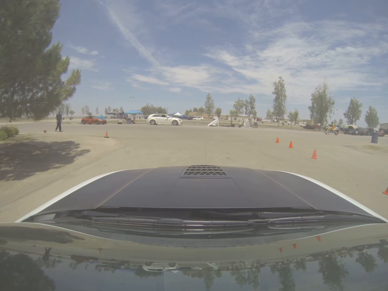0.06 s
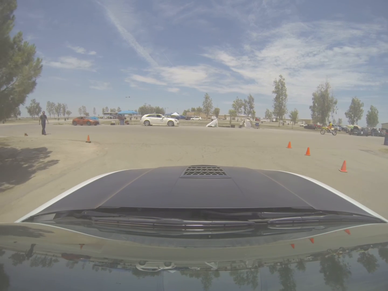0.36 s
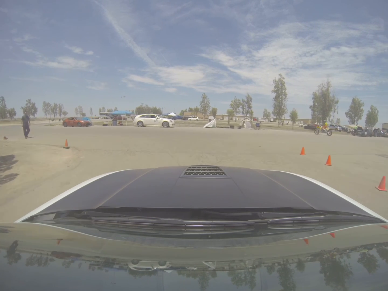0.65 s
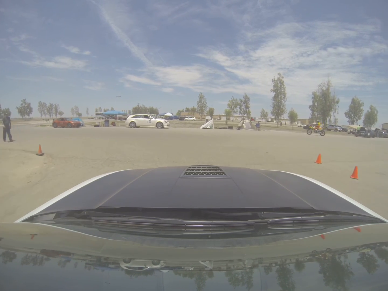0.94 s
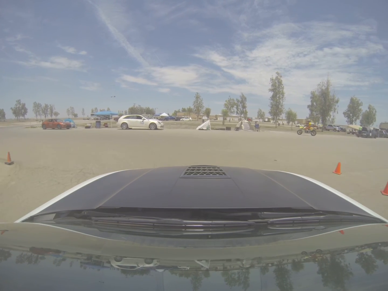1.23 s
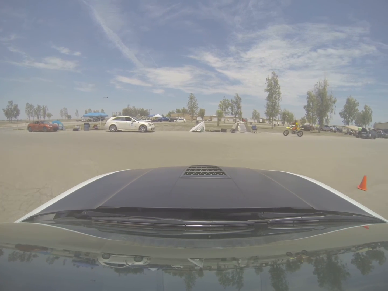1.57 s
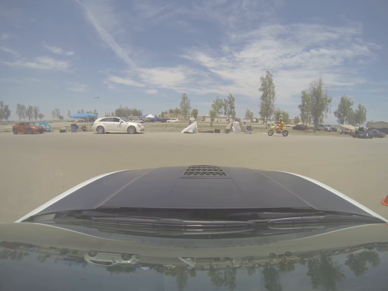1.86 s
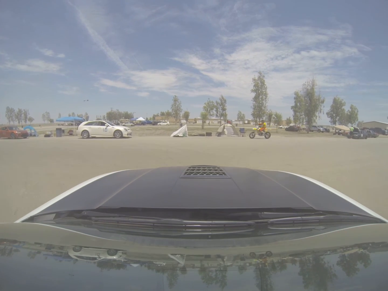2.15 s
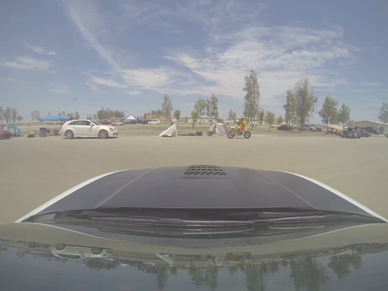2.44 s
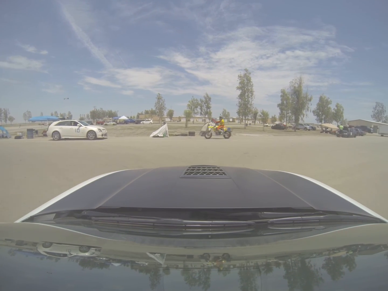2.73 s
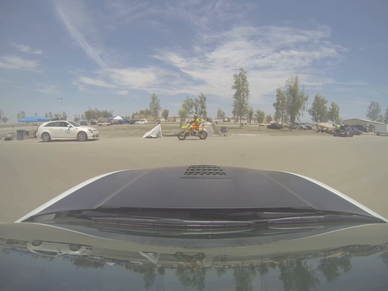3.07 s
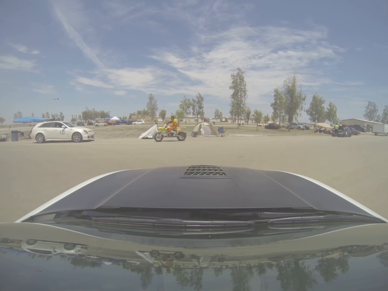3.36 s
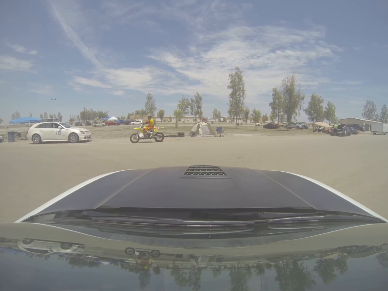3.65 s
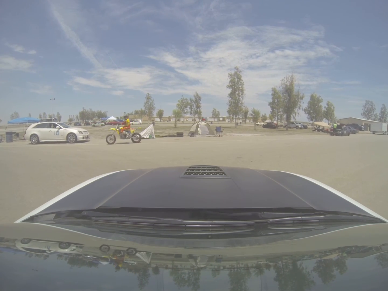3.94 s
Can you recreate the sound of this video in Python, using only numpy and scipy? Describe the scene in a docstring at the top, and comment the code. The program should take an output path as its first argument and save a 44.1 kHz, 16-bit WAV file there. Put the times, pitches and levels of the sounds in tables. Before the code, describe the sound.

A car engine rumbles at idle, heard inside the cabin, with tyre rumble and a low hum that sinks as the car slows. Soft bumps shake the body during the first two seconds, with a dull knock at about 2.2 seconds. A motorcycle thumps underneath from about half a second, growing louder near 3 seconds as it crosses in front with faint chain rasp and engine chatter.

```python
"""A car rolls slowly towards a halt on a paved paddock, heard from behind the windscreen.
From the start its idling engine booms in the cabin and whirrs under the bonnet, the tyres rumble,
the drive hum sinks and the camera adds hiss and a faint pulsing whine. A single-cylinder motorcycle
thumps closer while dips and seams shake the car's body. Later the brakes rub lightly and the
motorcycle crosses in front, its chain rasping and its engine chattering."""
import sys
import numpy as np
from scipy import signal
from scipy.fft import rfft, irfft
from scipy.io import wavfile
from scipy.ndimage import uniform_filter1d, map_coordinates

SR = 44100
rng = np.random.default_rng(int(sys.argv[2]) if len(sys.argv) > 2 else 0)


def pcm_store(signal):
    """Save signal as 16-bit PCM."""
    levels = np.round(np.clip(np.atleast_2d(signal), -1, 1) * 32767)
    wavfile.write(sys.argv[1], SR, levels.astype(np.int16).T)


N = 176400
T = np.arange(N) / SR


def undb(db):
    """Decibels to amplitude ratio."""
    return 10 ** (np.asarray(db) / 20)

def unit(x):
    """Normalisation to an rms of one."""
    return x / np.sqrt(np.mean(x ** 2))

def curve(rows, axis=1):
    """Linear interpolation of one column over time."""
    rows = np.array(rows)
    return np.interp(T, rows[:, 0], rows[:, axis])

def wander(per_s):
    """Smooth random fluctuation with an rms of one."""
    return unit(map_coordinates(rng.standard_normal(2000), [T * per_s + 2], order=3, mode="wrap"))

def colour(x, points):
    """Minimum-phase filtering through (Hz, dB) points."""
    points, size = np.array(points), 2 * N
    hz = np.maximum(np.arange(N + 1) * SR / size, 1)
    gain = undb(np.interp(np.log(hz), np.log(points[:, 0]), points[:, 1]))
    cepstrum = irfft(np.log(gain))
    cepstrum[1:N] *= 2
    cepstrum[N + 1:] = 0
    return irfft(rfft(x, size) * np.exp(rfft(cepstrum)))[:N]

def noise(points):
    """Coloured noise with an rms of one."""
    return unit(colour(rng.standard_normal(N), points))

def passband(x, order, hz, kind="lowpass"):
    """Maximally flat filtering."""
    return signal.sosfilt(signal.butter(order, hz, kind, fs=SR, output="sos"), x)

def resonate(x, hz, width_hz):
    """Two equal resonators in cascade, each of the given bandwidth."""
    b, a = signal.iirpeak(hz, hz / width_hz, SR)
    return signal.lfilter(b, a, signal.lfilter(b, a, x))

def ring(x, modes):
    """Modal response: convolution with a sum of damped sinusoids."""
    t = T[:N // 8]
    response = sum(undb(db) * np.sin(2 * np.pi * hz * t) * 1000 ** (-t / t60) for hz, db, t60 in modes)
    return signal.fftconvolve(x, response)[:N]

def pulse_train(cycles, scatter_db):
    """One impulse of random strength at each whole cycle."""
    at = np.flatnonzero(np.diff(np.floor(cycles)) > 0)
    out = np.zeros(N)
    out[at] = undb(scatter_db * rng.standard_normal(N // 100)[:len(at)])
    return out

def blows(rows):
    """Ideal impacts: single impulses at (s, dB)."""
    out = np.zeros(N)
    for start, db in rows:
        out[int(start * SR)] += undb(db)
    return out

def glide(rows, harmonic=1):
    """A harmonic of a tone following (s, Hz, dB rms); phase is the integral of frequency."""
    cycles = harmonic * np.cumsum(curve(rows)) / SR
    return np.sqrt(2) * np.sin(2 * np.pi * cycles) * undb(curve(rows, axis=2))

def swells(rows):
    """A sum of bell-shaped envelopes."""
    return sum(undb(db) * np.exp(-((T - centre) / half) ** 2) for centre, half, db in rows)

def rattle(points, clicks_per_s=2000, scatter_db=3, tail_s=.00085):
    """Shot noise: dense random metal clicks, each with an exponential tail of energy."""
    clicks = (rng.random(N) < clicks_per_s / SR) * undb(scatter_db * rng.standard_normal(N))
    energy = signal.lfilter([1], [1, -np.exp(-1 / (tail_s * SR))], clicks ** 2)
    return unit(colour(np.sqrt(energy) * rng.standard_normal(N), points))


# Boom at the firing rate. Each row: time in seconds, relative level in dB.
BOOM_ENVELOPE = [(0.03, -19), (0.35, -28.5), (0.49, -19.5), (0.69, -23.5), (0.75, -38), (0.94, -23.5),
                 (1.04, -38.5), (1.15, -25), (1.49, -34.5), (1.61, -24), (1.89, -40.5), (1.96, -30),
                 (2.2, -31), (2.48, -27), (2.9, -34), (3.1, -28), (3.59, -32), (4.0, -54)]
# Cabin resonances. Each row: frequency in Hz, half-bandwidth of one stage in Hz, gain in dB.
CABIN_RESONANCES = [(41, 51, 1), (91.5, 31, 1), (110, 12, -10), (160.3, 13.2, 8.5), (174, 4, -26)]
def engine_boom(cycles):
    """Forced vibration: the firings drive the cabin air at their own rate and at its resonances."""
    fundamental = np.sqrt(2) * np.sin(2 * np.pi * cycles) * undb(curve(BOOM_ENVELOPE) + 1.5)
    firings = pulse_train(cycles, scatter_db=7)
    cabin = sum(undb(db) * resonate(firings, hz, 2 * half) for hz, half, db in CABIN_RESONANCES)
    return fundamental + undb(-45) * passband(unit(cabin), order=6, hz=209)

# Whirr of belts and valve gear. Each row: frequency in Hz, relative spectral density in dB.
WHIRR_SPECTRUM = [(300, -6.5), (700, -9), (930, -7.5), (1070, -16.5), (1200, -7), (1340, -1), (1640, -0.5),
                  (1820, -16.5), (1950, -12), (2200, -18), (3100, -23.5), (3480, -19), (4300, -30.5),
                  (7000, -73)]
def belt_whirr(cycles):
    """Amplitude modulation: belt noise pulses at twice the firing rate and flickers at random."""
    pulsing = 1 + .18 * np.cos(2 * np.pi * 2 * cycles)
    return undb(-54) * unit(noise(WHIRR_SPECTRUM) * pulsing * undb(1.62 * wander(45)))

# Valve gear modes. Each row: frequency in Hz, relative level in dB, 60 dB decay time in seconds.
VALVE_GEAR_MODES = [(1320, -11, 0.072), (1377, 10.5, 0.047), (1440, -7, 0.03), (1632, 7, 0.059),
                    (1900, -13, 0.027), (3514, -4.5, 0.046), (4005, -7.5, 0.037)]
def valve_taps(cycles):
    """Impact excitation: taps ring the metal at a rate proportional to engine speed."""
    taps = pulse_train(np.pi * cycles + .15 * wander(50), scatter_db=2.2)
    return undb(-61) * unit(ring(taps, VALVE_GEAR_MODES))

def fan_hum(hz=194.5):
    """Tonal noise of rotation: the fan hums, wavering slightly in pitch and level."""
    cycles = np.cumsum(hz * (1 + .0036 * wander(4.1))) / SR
    return undb(-49.5) * unit(np.sin(2 * np.pi * cycles) * undb(wander(3.4)))

# Fundamental of the drive. Each row: time in seconds, frequency in Hz, mean level in dB.
DRIVE_TONE = [(0, 100.1, -31.5), (.43, 92.6, -31), (.5, 91.62, -34.5), (1.0, 86.13, -33),
              (1.5, 83.8, -34.5), (2.1, 78.96, -37), (2.7, 74.37, -41), (3.1, 68.14, -41),
              (3.5, 61.37, -40.5), (4, 53.16, -43)]
def drive_hum(flutter_db=1.5, octave_db=-10.5):
    """Frequency follows rotation speed: the hum and its octave sink as the car slows."""
    fundamental = glide(DRIVE_TONE) * undb(flutter_db * wander(6.02))
    return fundamental + glide(DRIVE_TONE, harmonic=2) * undb(octave_db)

# Road rumble. Each row: frequency in Hz, relative spectral density in dB.
ROAD_SPECTRUM = [(5, -57.5), (14, -14.5), (28, -8.5), (45, 6.5), (66, -1), (85, -6.5), (130, -6), (165, 0),
                 (190, -12.5), (215, -18), (300, -21.5), (450, -29.5), (700, -37.5), (1200, -66.5),
                 (4000, -57), (15000, -82)]
# Its envelope. Each row: time in seconds, level in dB.
ROAD_ENVELOPE = [(0, -28.5), (.45, -34), (.8, -32), (1.5, -33), (2.3, -33), (3, -35.5), (4, -37.5)]
def tyre_rumble():
    """Random excitation: tyres rolling on paving make low-frequency noise."""
    return noise(ROAD_SPECTRUM) * undb(curve(ROAD_ENVELOPE))

# Whine bands. Each row: centre in Hz, stage bandwidth in Hz, burst level in dB, share left in the gaps.
WHINE_BANDS = [(5630, 150, -82.5, .6), (11300, 300, -84.5, .3)]
# Hiss. Each row: frequency in Hz, relative spectral density in dB.
HISS_SPECTRUM = [(500, 9.5), (2500, 10.5), (4000, 3.5), (4600, 3.5), (6100, 1), (8200, 1), (9000, -3.5),
                 (11000, -3), (12000, -8.5), (13600, -12.5), (14500, -6.5)]
def camera_noise(frame_hz=23.976):
    """Electrical noise: narrow bands swell once a frame over a steady broadband hiss."""
    phase = T * frame_hz % 1
    gate = uniform_filter1d(((phase > .43) & (phase < .84)) * 1., size=60)
    whine = np.zeros(N)
    for hz, width, db, floor in WHINE_BANDS:
        band = unit(resonate(rng.standard_normal(N), hz, width))
        whine += undb(db) * band * (floor + (1 - floor) * gate)
    return whine + undb(-67.5) * noise(HISS_SPECTRUM)

# Motorcycle engine speed. Each row: time in seconds, firing rate in Hz.
BIKE_FIRING_RATE = [(0, 20.038), (.9, 18.614), (1.5, 19.741), (2.1, 19.785), (2.7, 19.886), (4, 19.864)]
def motorcycle_cycles():
    """Phase as the integral of firing rate, in cycles, with slight jitter."""
    return .475 + np.cumsum(curve(BIKE_FIRING_RATE)) / SR + .009 * wander(20)

# Exhaust beat. Each row: frequency in Hz, relative spectral density in dB.
EXHAUST_SPECTRUM = [(5, -47.5), (20, 11.5), (40, 6), (70, 1.5), (100, 10.5), (205, -2), (270, 6), (400, -1),
                    (600, -13), (760, -27), (1200, -30.5), (3000, -53), (10000, -81)]
# Its envelope. Each row: time in seconds, relative level in dB.
EXHAUST_ENVELOPE = [(0, -17.5), (.6, -5), (1.6, -4), (2.3, -4.5), (2.8, -1), (3.4, 0.5), (4, 0.5)]
# Cabin modes it rings. Each row: frequency in Hz, relative level in dB, 60 dB decay time in seconds.
CABIN_MODES = [(38, -5, 0.23), (77.3, -9.5, 0.11), (98.3, 1, 0.22), (117.7, -3, 0.25), (159.45, -2, 0.21)]
# Envelope of their boom. Each row: time in seconds, gain in dB.
CABIN_ENVELOPE = [(0, -45), (.6, -36), (1.7, -38.5), (2.3, -36), (2.8, -33), (3.3, -33), (4, -32.5)]
def motorcycle_exhaust(cycles, cabin_lag_s=.01038):
    """Sympathetic resonance: each exhaust pulse is followed by a boom in the car's cabin."""
    firings = pulse_train(cycles, scatter_db=.8)
    beat = unit(colour(firings, EXHAUST_SPECTRUM)) * undb(curve(EXHAUST_ENVELOPE) - 41)
    delayed = np.interp(T - cabin_lag_s, T, firings, left=0)
    boom = passband(unit(ring(delayed, CABIN_MODES)), order=4, hz=[25, 190], kind="bandpass")
    return beat + boom * undb(curve(CABIN_ENVELOPE))

# Light jolts. Each row: start in seconds, impulse strength in dB.
PANEL_JOLTS = [(.243, -19), (.48, -22), (.732, -20), (.905, -35), (.992, -20), (1.14, -23.5), (1.25, -23.5),
               (1.3, -24.5), (1.805, -22)]
# Panel modes. Each row: frequency in Hz, gain in dB, 60 dB decay time in seconds.
PANEL_MODES = [(156.2, -2, 0.22), (164.4, -20, 0.18)]
def panel_drone(cutoff_hz=215):
    """Free vibration: a panel drones on after each soft jolt."""
    force = passband(blows(PANEL_JOLTS), order=2, hz=cutoff_hz)
    return ring(passband(force, order=2, hz=cutoff_hz), PANEL_MODES)

# Groan of the body. Each row: time in seconds, frequency in Hz, level in dB.
GROAN_TONE = [(.25, 222, -90), (.3, 214, -44), (.36, 180, -47), (.41, 152, -34), (.445, 108, -31),
              (.47, 58, -28), (.5, 48, -36), (.56, 45, -90)]
def body_groan():
    """Frequency sweep: the body gives a falling tone as it rolls into a dip."""
    return glide(GROAN_TONE)

# Seams in the paving. Each row: start in seconds, impulse strength in dB.
SEAM_BLOWS = [(.365, -28), (2.189, -17.5)]
# Body modes. Each row: frequency in Hz, gain in dB, 60 dB decay time in seconds.
BODY_MODES = [(92, 0, 0.3), (157, -13.5, 0.11), (246, -15.5, 0.072), (352, -17, 0.1)]
def seam_knocks():
    """Soft impact: a seam excites mainly the low modes of the body."""
    return ring(passband(blows(SEAM_BLOWS), order=2, hz=300), BODY_MODES)

# Dips. Each row: centre in seconds, half-width in seconds, peak level in dB.
SPRING_SWELLS = [(.468, .024, -23), (.926, .024, -24.5), (1.135, .024, -27.5)]
def spring_thumps(hz=52):
    """Transient oscillation: each dip draws a short low tone burst from the springs."""
    return swells(SPRING_SWELLS) * np.sin(2 * np.pi * hz * T)

# Ticks of grit and trim. Each row: start in seconds, relative level in dB.
GRIT_TICKS = [(.766, -48.5), (1.151, -47.5), (1.89, -57), (2.06, -49.5), (2.44, -57), (2.855, -56),
              (3.768, -57), (3.895, -56)]
# Their timbre. Each row: frequency in Hz, relative spectral density in dB.
TICK_SPECTRUM = [(800, -15), (1500, 4), (2200, -7), (3800, 0), (5000, -8), (6700, -5), (8000, -15),
                 (14000, -32)]
def grit_ticks(decay_s=.004):
    """Exponential decay: grit and trim tick in brief bursts of broadband noise."""
    envelope = sum(undb(db) * (T >= s) * np.exp(-np.abs(T - s) / decay_s) for s, db in GRIT_TICKS)
    return .5 * envelope * noise(TICK_SPECTRUM)

# Motorcycle chain. Each row: frequency in Hz, relative spectral density in dB.
CHAIN_SPECTRUM = [(300, -25), (900, -6), (1400, 7), (1900, 1), (2400, 2.5), (3100, -4), (3700, -7),
                  (4400, -18), (7400, -24), (10000, -36)]
# Its swells. Each row: centre in seconds, half-width in seconds, peak level in dB.
CHAIN_SWELLS = [(1.21, .07, -63.5), (2.72, .08, -63.5), (2.853, .045, -60), (2.96, .06, -66),
                (3.08, .035, -60.5), (3.155, .04, -60), (3.24, .07, -62)]
def chain_rasp():
    """Superposition of impacts: the chain's many clicks merge into swells of rasp."""
    return rattle(CHAIN_SPECTRUM) * swells(CHAIN_SWELLS)

# Clacks under the bonnet. Each row: start in seconds, impulse strength in dB.
BONNET_BLOWS = [(1.267, -41), (2.058, -38.5), (3.084, -42), (3.255, -43), (3.743, -43)]
# Their modes. Each row: frequency in Hz, gain in dB, 60 dB decay time in seconds.
BONNET_MODES = [(1390, -8, .035), (1507, -4, .045), (1690, -7, .045)]
def bonnet_clacks():
    """Transmission through a partition: the bulkhead passes one band of each ringing clack."""
    return passband(ring(blows(BONNET_BLOWS), BONNET_MODES), order=2, hz=(1250, 1850), kind="bandpass")

# Brake rub. Each row: time in seconds, level in dB.
BRAKE_ENVELOPE = [(0, -91), (2.2, -88), (2.8, -81.5), (3.3, -77.5), (3.7, -82), (4, -95)]
def brake_rub():
    """Friction noise: light rubbing excites one narrow, high resonance."""
    return unit(resonate(rng.standard_normal(N), hz=6720, width_hz=134)) * undb(curve(BRAKE_ENVELOPE))

# Motorcycle engine chatter. Each row: frequency in Hz, relative spectral density in dB.
CHATTER_SPECTRUM = [(1200, -30), (2400, -11), (3200, 5), (3750, 4.5), (4400, -16), (5050, 0.5), (5400, -11),
                    (5700, 1.5), (6200, -14.5), (7300, -6.5), (9000, -26.5), (14000, -41)]
# Its envelope. Each row: time in seconds, level in dB.
CHATTER_ENVELOPE = [(0, -96), (2.3, -96), (3, -75), (3.6, -70), (3.8, -68), (4, -68.5)]
def motorcycle_chatter(cycles, depth=.4):
    """Amplitude modulation: bright clatter, heard once side-on, pulses with each engine cycle."""
    pulsing = 1 + depth * np.sin(2 * np.pi * cycles)
    return rattle(CHATTER_SPECTRUM) * undb(curve(CHATTER_ENVELOPE)) * pulsing


def scene(idle_hz=22.845):
    """Superposition: all sources add at one microphone."""
    car_cycles = np.cumsum(idle_hz * (1 + .025 * wander(7))) / SR
    engine = engine_boom(car_cycles) + belt_whirr(car_cycles) + valve_taps(car_cycles) + fan_hum()
    rolling = drive_hum() + tyre_rumble() + brake_rub()
    body = panel_drone() + body_groan() + seam_knocks() + spring_thumps() + grit_ticks()
    bike_cycles = motorcycle_cycles()
    motorcycle = motorcycle_exhaust(bike_cycles) + chain_rasp() + motorcycle_chatter(bike_cycles)
    return (engine + rolling + body + bonnet_clacks() + motorcycle + camera_noise())[None]

def record(dry, cutoff_hz=15000):
    """Band limiting: the camera cuts the highest treble steeply."""
    return signal.sosfilt(signal.ellip(8, .2, 70, cutoff_hz, fs=SR, output="sos"), dry)


dry = scene()
out = record(dry)
pcm_store(out)
```